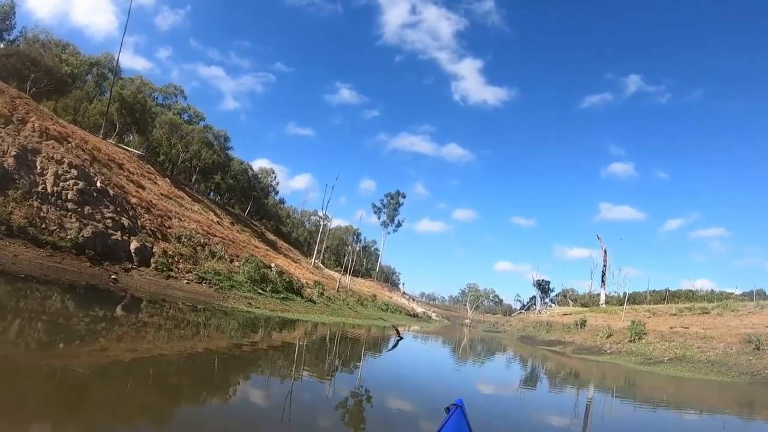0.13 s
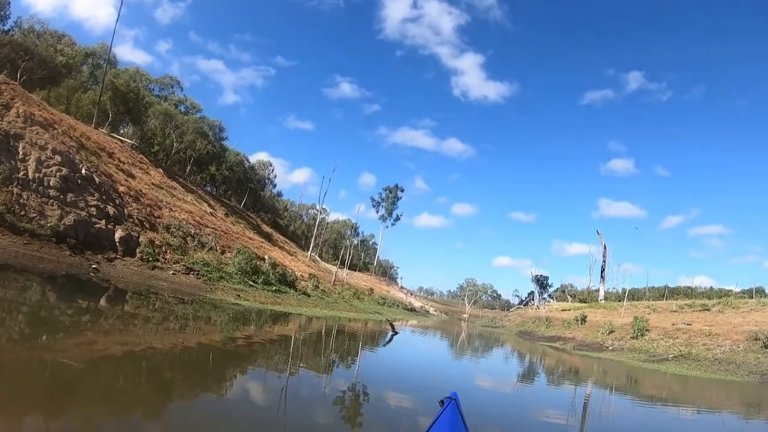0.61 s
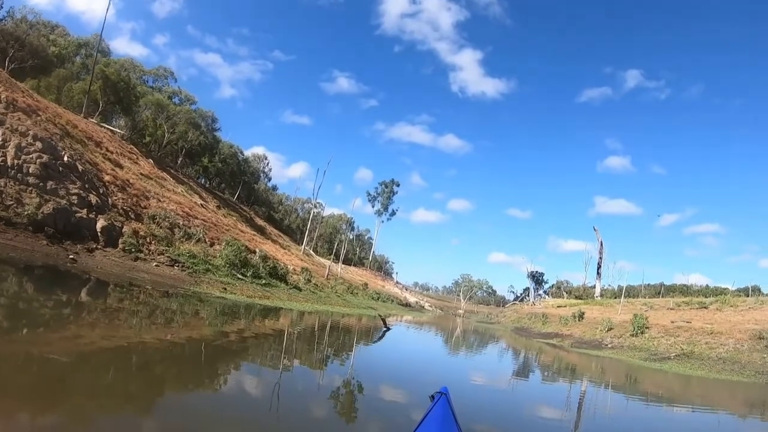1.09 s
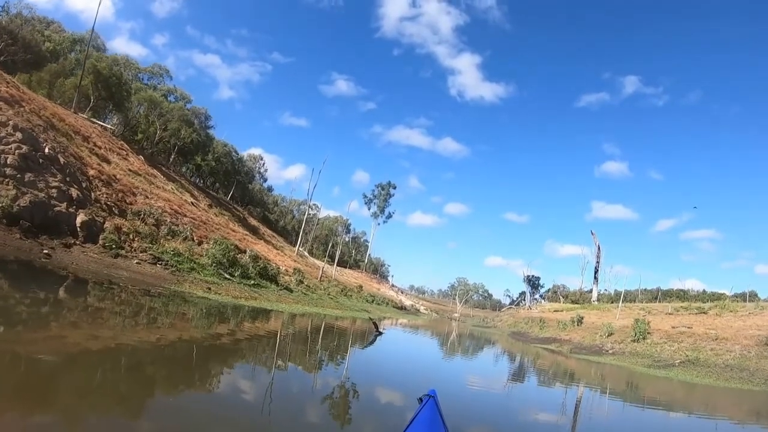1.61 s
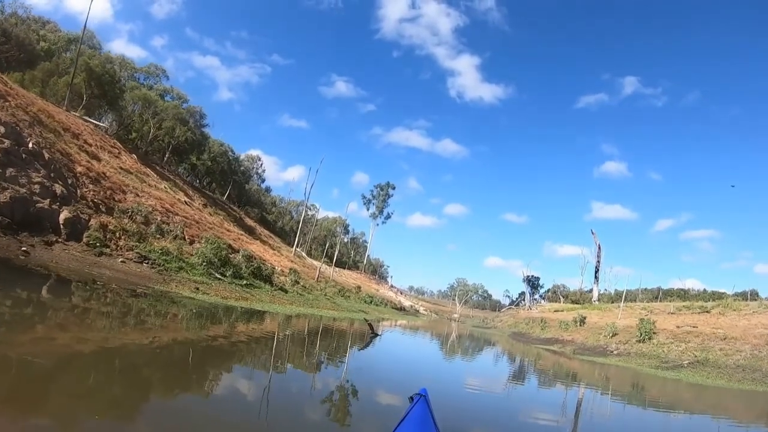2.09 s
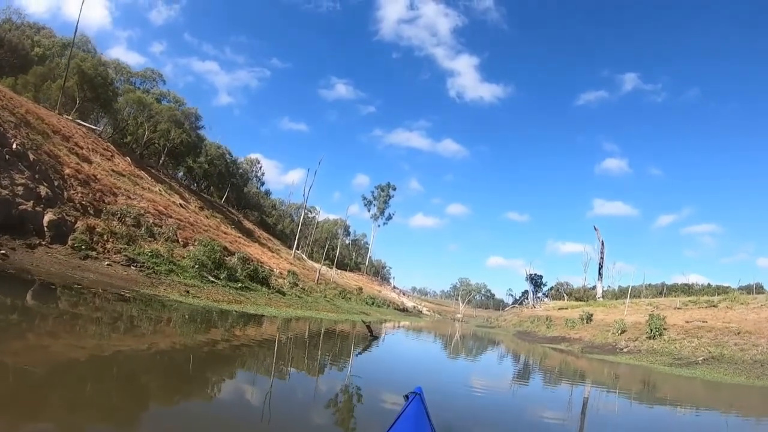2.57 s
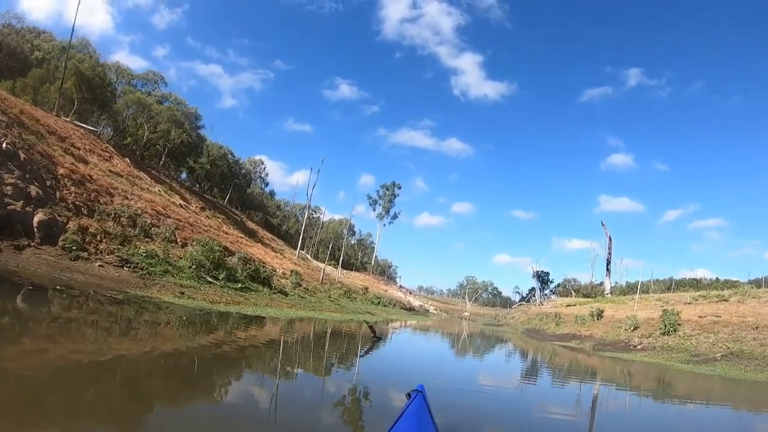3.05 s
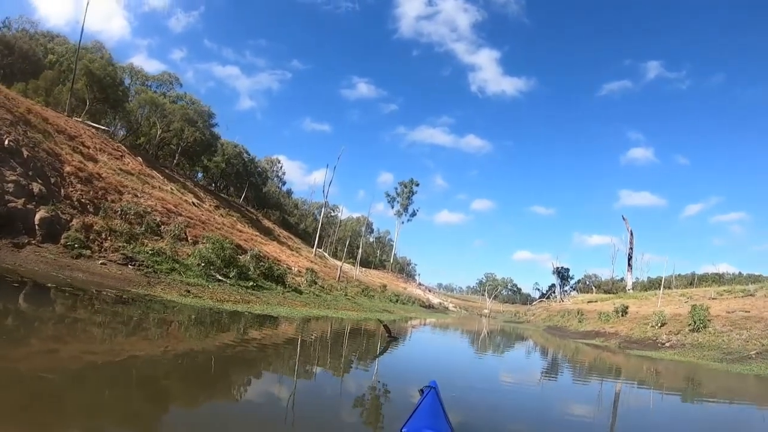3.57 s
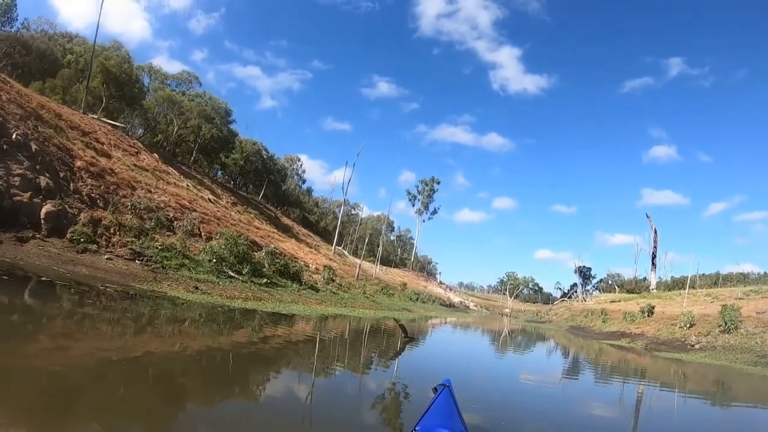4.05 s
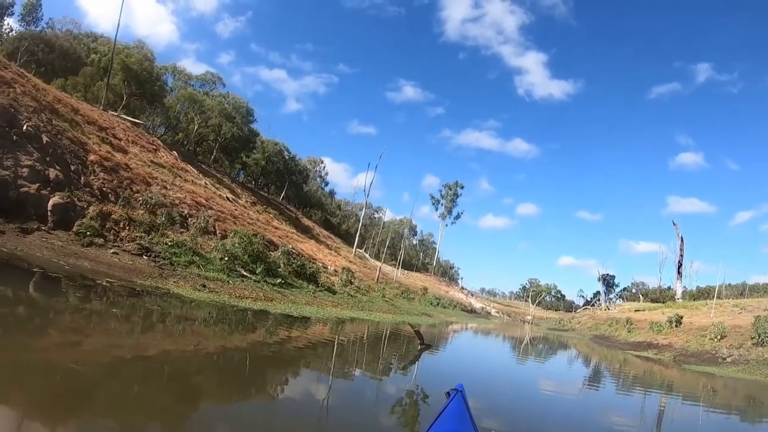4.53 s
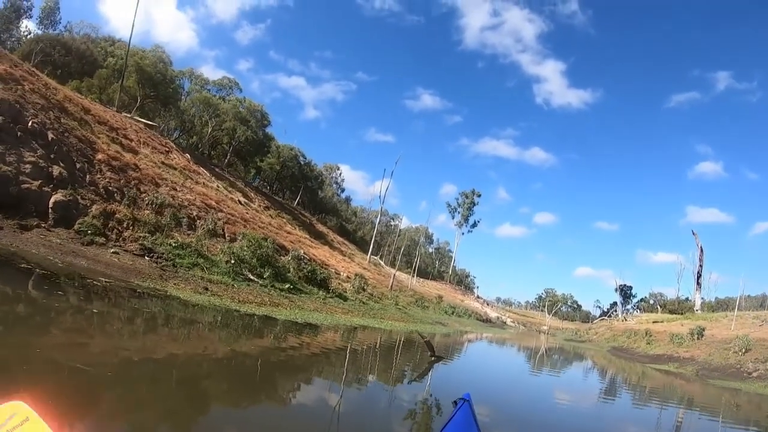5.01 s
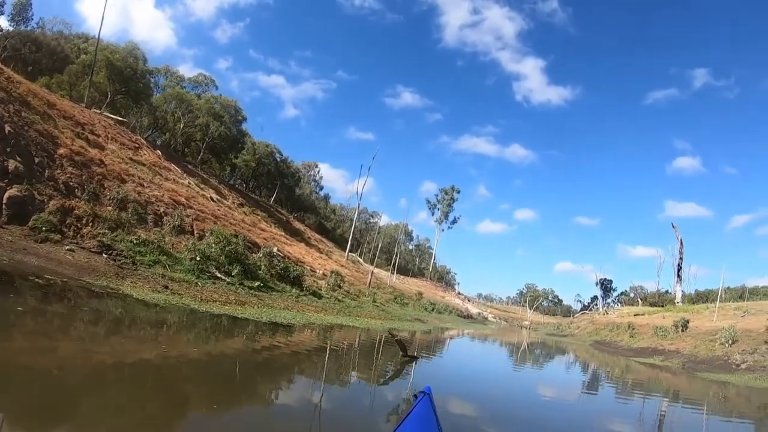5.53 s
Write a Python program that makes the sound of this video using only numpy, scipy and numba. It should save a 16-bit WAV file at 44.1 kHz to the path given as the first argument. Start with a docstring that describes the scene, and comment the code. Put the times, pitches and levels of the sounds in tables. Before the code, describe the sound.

Water laps a kayak hull while a bank insect trills in short phrases; drops plop, then a paddle clacks on the deck with a hollow boom.

```python
"""Calm river heard from a hollow plastic kayak by two microphone ports, left and right.
From the start wavelets slap the right side and ring the hull modes, filtered-noise gusts rumble on the ports,
the hull air throbs, and a bank insect trills in short phrases of gated tone until 4.3 s. From 2.5 s drops
plop as gliding decaying sines; at 4.1 s a gurgle climbs; at 4.34 s the paddle knocks and bounces, a click
with a modal deck boom; near 5.5 s fine drops spatter as grains. Faint insects and air hiss lie beneath."""
import sys
import numpy as np
from scipy import signal
from scipy.fft import rfft, irfft
from scipy.io import wavfile
from scipy.ndimage import uniform_filter1d
from numba import njit

SR = 44100
rng = np.random.default_rng(int(sys.argv[2]) if len(sys.argv) > 2 else 0)


def output_pcm(signal):
    """Save a mono or channel-first signal as 16-bit PCM at the path in sys.argv[1].

    Samples are clipped to [-1, 1] before scaling.
    """
    pcm = np.clip(np.atleast_2d(signal).T, -1, 1) * 32767
    wavfile.write(sys.argv[1], SR, np.round(pcm).astype(np.int16))


def makeup_ratio(level_db):
    """Linear amplitude ratio for a level in decibels (20 dB per factor of ten)."""
    decades = np.asarray(level_db, float) / 20
    return 10 ** decades


N = 248724
T = np.arange(N) / SR


def unit(x):
    """Scale to rms 1."""
    return x / np.sqrt(np.mean(x ** 2))


def band(x, lo_hz, hi_hz, order=2):
    """Butterworth band-pass."""
    return signal.sosfilt(signal.butter(order, [lo_hz, hi_hz], "band", fs=SR, output="sos"), x)


def curve(table):
    """Columns of a table joined by straight lines in time."""
    t_s, *columns = np.transpose(table)
    return [np.interp(T, t_s, column) for column in columns]


def walk(rate_hz):
    """Random levels held 1 / rate_hz and slewed twice, rms 1."""
    hold = int(SR / rate_hz)
    steps = np.repeat(rng.standard_normal(N // hold + 1), hold)
    slewed = uniform_filter1d(uniform_filter1d(steps, hold), hold)
    return unit(slewed[:N])


def sine(f_hz):
    """Sine following a frequency curve."""
    return np.sin(2 * np.pi * np.cumsum(f_hz) / SR)


def decay(t_s, t60_s):
    """Exponential fall by 60 dB in t60_s."""
    return np.exp(-np.log(1000) * t_s / t60_s)


def ring(x, modes):
    """Bank of decaying two-pole modes with alternating signs."""
    out = 0
    for k, (f_hz, db, t60_s) in enumerate(modes):
        r = decay(1 / SR, t60_s)
        w = 2 * np.pi * f_hz / SR
        mode = signal.lfilter([0, r * np.sin(w)], [1, -2 * r * np.cos(w), r * r], x)
        out = out + (-1) ** k * makeup_ratio(db) * mode
    return out


def add(out, t_s, x):
    """Mix x into out from t_s."""
    i = int(t_s * SR)
    n = min(x.shape[-1], N - i)
    out[..., i:i + n] += x[..., :n]


@njit
def svf(x, f_hz, width_hz):
    """State-variable band-pass with a moving centre."""
    y, b, l = np.empty(len(x)), 0., 0.
    for i in range(len(x)):
        g, k = np.tan(np.pi * f_hz[i] / SR), width_hz / f_hz[i]
        v = (b + g * (x[i] - l)) / (1 + g * (g + k))
        b, l, y[i] = 2 * v - b, l + 2 * g * v, k * v
    return y


def grit(shape, share, spread_db):
    """Sparse grains of very uneven size, rms 1."""
    luck = np.minimum(rng.exponential(size=shape), 4)
    hits = rng.random(shape) < share
    return unit(rng.standard_normal(shape) * hits * makeup_ratio(spread_db * luck))


def bubble(f_hz, db, cycles, glide=0.029):
    """A bubble glides up as it dies."""
    life_s = cycles / f_hz / 3
    t = T[:int(7 * life_s * SR)]
    tone = np.sin(2 * np.pi * f_hz * t * (1 + glide * t / life_s))
    return makeup_ratio(db) * tone * np.exp(-t / life_s) * np.minimum(3 * t / life_s, 1)


def from_right(near, far, left_db, split_hz=420, lag_s=.00027):
    """Long waves reach both ports alike; short ones reach the left late, weaker and by another path."""
    low = signal.butter(2, split_hz, fs=SR, output="sos")
    bass = signal.sosfiltfilt(low, near)
    round_about = np.roll(far - signal.sosfiltfilt(low, far), int(lag_s * SR))
    return np.array([bass + makeup_ratio(left_db) * round_about, near])


# wavelets against the hull: [t/s, relative level/dB, sharpness/dB, slosh t60/s]
SLAPS = [(0.085, -35.5, -14.5, 0.073), (0.364, -31, -23, 0.2), (.403, -31, -22, 0.16),
         (.422, -23.5, -9.5, 0.068), (.461, -23, -16.5, 0.14), (.482, -17.5, -15, 0.09),
         (0.489, -23.5, -22, 0.05), (.542, -30.5, -14, 0.034), (0.575, -37.5, -32, 0.068),
         (.602, -39.5, -22, 0.063), (.635, -41.5, -19, 0.1), (.673, -16.5, -20, 0.092),
         (0.872, -51, -32, .073), (.947, -47.5, -20, 0.31), (.981, -26.5, -18, 0.13),
         (1.004, -36.5, -18, 0.16), (1.034, -48, -18, 0.07), (1.086, -43.5, -35, .069),
         (1.112, -47, -32, 0.083), (1.139, -44, -35, 0.12), (1.164, -50, -33, 0.05),
         (1.202, -55, -24, .054), (1.254, -30.5, -19.5, .077), (1.294, -44.5, -32, 0.067),
         (1.43, -44.5, -18, 0.11), (1.459, -22.5, -14.5, 0.039), (1.467, -23.5, -18, 0.098),
         (1.587, -39, -25.5, 0.21), (1.742, -45.5, -20, 0.033), (1.817, -38, -19.5, 0.13),
         (1.89, -41, -12, 0.12), (2.004, -39, -28, 0.42), (2.034, -35, -17, 0.052),
         (2.059, -45.5, -5, 0.11), (2.148, -21.5, -17, .1), (2.215, -42.5, -9.5, 0.15),
         (2.226, -28.5, -19, 0.13), (2.244, -30.5, -16.5, 0.048), (2.348, -39.5, -21.5, 0.053),
         (2.537, -46.5, -12.5, 0.22), (2.608, -28.5, -17.5, 0.062), (2.696, -31.5, -22, .091),
         (2.803, -37, -19, 0.11), (2.833, -24, -14, 0.083), (3.095, -38.5, -31, 0.064),
         (3.112, -38.5, -34.5, 0.068), (3.314, -44.5, -18, 0.055), (3.338, -43, -20, 0.054),
         (3.387, -43, -16, 0.068), (3.562, -45.5, -17, 0.14), (3.655, -28.5, -18.5, 0.068),
         (3.689, -38.5, -13, 0.13), (3.729, -41, -24, 0.1), (3.821, -39.5, -35, 0.16),
         (3.865, -23, -15.5, 0.095), (4.18, -34, -25, 0.28), (4.203, -24, -13, 0.062),
         (4.247, -37.5, -20.5, 0.26), (4.657, -40.5, -28, .041), (4.743, -19, -13.5, 0.098),
         (5.02, -45, -23, 0.049), (5.489, -47.5, -8.5, .2)]


def slaps():
    """Each slap is a sharp blow and a dying slosh; steeper ones push the upper modes more."""
    blow, push, sharp = np.zeros(N), np.zeros((2, N)), np.zeros((2, N))
    t = T[:6000]
    for t_s, db, sharp_db, t60_s in SLAPS:
        slosh = makeup_ratio(-19.5) * grit((2, len(t)), 0.12, 1.52)
        slosh = slosh * decay(t, max(t60_s, .01)) * np.minimum(t / 0.0035, 1)
        slosh[:, 0] = [1.3, .4]  # the first blow faces the right port
        add(blow, t_s, makeup_ratio([db]))
        add(push, t_s, makeup_ratio(db) * slosh)
        add(sharp, t_s, makeup_ratio(db + sharp_db) * slosh)
    return blow, push, sharp


def froth(lap_db, count=7, per_s=90):
    """Bubbles left by every slap, and strays in the sliding water."""
    out = np.zeros(N)
    for t_s, db, _, t60_s in SLAPS:
        for late, size, luck in rng.random((count, 3)):
            bubble_db = db - 3.0 - 24 * late - 8 * luck - 6 * size
            add(out, t_s + .5 * late * t60_s, bubble(450 * 5 ** size, bubble_db, 16))
    for when, size, luck in rng.random((int(per_s * N / SR), 3)):
        bubble_db = lap_db[int(when * (N - 1))] + 3.5 - 12 * luck - 8 * size
        add(out, when * T[-1], bubble(300 * 6 ** size, bubble_db, 13))
    return out


# spray thrown up by the steeper slaps: [t/s, relative level/dB]
SPRAYS = [(0.083, -55.5), (.422, -42), (0.46, -47), (.482, -45.5), (.49, -50), (.542, -59), (.673, -44.5),
          (0.983, -71), (1.254, -62), (1.459, -51), (1.467, -51.5), (1.776, -56.5), (1.815, -57),
          (1.889, -60), (2.033, -56.5), (2.058, -50), (2.148, -52.5), (2.214, -51), (2.244, -60),
          (2.695, -55), (2.833, -46), (3.688, -56), (3.73, -57), (3.867, -50.5), (4.202, -51), (4.247, -59),
          (4.744, -39), (5.483, -52)]


def spray():
    """Each spray is a noise burst with a fast and a slow decay."""
    out, t = np.zeros((2, N)), T[:6000]
    for t_s, db in SPRAYS:
        envelope = np.exp(-t / 0.00029) + 0.46 * np.exp(-t / 0.0053)
        add(out, t_s, makeup_ratio(db) * rng.standard_normal((2, len(t))) * envelope)
    return makeup_ratio(13.0) * band(out, 2200, 5520)


# hull shell modes: [f/Hz, relative level/dB, t60/s]
HULL = [(200.3, -13.5, 0.14), (282.6, -10.5, 0.072), (414, -7, 0.091), (479, -4.5, 0.083), (550, 1, 0.02),
        (653.6, -2, 0.06), (765.7, 2, 0.036), (938, 1.5, 0.027), (1065.5, 3, 0.02), (1275, 0, 0.022),
        (1376, -7.5, 0.04), (1558, -2.5, 0.021), (1723, -11.5, 0.052), (1930, -3.5, 0.01),
        (2248, -11, 0.019), (2485, -12.5, 0.02), (2888, -13, 0.01), (3360, -14.5, 0.0054)]
# water sliding along the hull: [t/s, relative level/dB, relative hiss level/dB]
LAP = [(0, -65.5, -78), (.36, -61, -70), (.56, -49.5, -78), (.72, -48, -77), (.8, -61, -86),
       (.85, -78, -92), (.93, -63.5, -85), (1.15, -71, -89), (1.35, -77, -90), (1.7, -79, -80),
       (1.85, -58, -81), (2.03, -64.5, -65), (2.33, -68, -80), (2.51, -57.5, -66), (2.65, -56.5, -63.5),
       (2.74, -51, -64.5), (2.88, -53.5, -67), (3.04, -60.5, -78), (3.32, -66.5, -77.5), (3.65, -50, -62),
       (3.78, -53, -66), (3.96, -60, -73.5), (4.2, -60.5, -67.5), (4.32, -45, -61.5), (4.48, -55, -87),
       (4.61, -65.5, -89), (4.76, -59, -63), (4.92, -63, -67.5), (5.24, -68.5, -67.5), (5.43, -68.5, -66.5),
       (5.52, -57.5, -65.5), (5.64, -61.5, -66)]
LEFT_DB, LEFT_SWAY_DB = -5, 1.5  # shadow of the left port


def water():
    """Slaps and sliding water drive the hull modes; smack, bubbles, spray and hiss come direct."""
    blow, push, sharp = slaps()
    lap_db, hiss_db = curve(LAP)
    flutter_db = 2.5 * walk(40)
    sliding = grit((2, N), 0.046, 2.9) * makeup_ratio(lap_db + flutter_db + 3.4 * walk(21) - 16)
    lower = ring(push + sliding, HULL[:10])
    upper = ring(makeup_ratio(20.0) * sharp + sliding, HULL[10:])
    near, other = makeup_ratio(-7) * (lower + upper)
    smack = makeup_ratio(13.5) * band(blow, 750, 1600)  # heard through the air
    bubbles = froth(lap_db)
    near = near + smack + bubbles
    far = 0.14 * near + 0.96 * other + .5 * bubbles
    hiss = unit(band(grit((2, N), 0.26, 1.3), 2000, 4000)) * makeup_ratio(hiss_db + .5 * flutter_db)
    return from_right(near, far, LEFT_DB + LEFT_SWAY_DB * walk(14)) + spray() + hiss


# paddle on the deck and its bounces: [t/s, relative click level/dB, relative thud level/dB]
KNOCKS = [(4.339, -1, -5), (4.347, -17.5, -5.5), (4.356, -42, -18.5), (4.365, -40, -11.5),
          (4.376, -21.5, -7), (4.39, -37, -20), (4.466, -24, -31), (4.54, -40.5, -51)]
# deck modes under the paddle: [f/Hz, relative level/dB, t60/s]
DECK = [(61.1, -6, 0.59), (84.1, 1.5, 0.38), (103.1, -17.5, 0.53), (124.7, -4, 0.068), (150, 4.5, 0.086),
        (162, -7, 0.35), (191.5, 2.5, 0.22), (227, -3.5, 0.21), (250, -8, 0.12), (280.8, -12.5, 0.3),
        (425.5, -12.5, 0.2)]


def paddle():
    """A hard click with a rattle of the mount, and the deck's boom, nearly centred."""
    click, rattle, wash = np.zeros((2, N)), np.zeros((2, N)), np.zeros((2, N))
    thud, t = np.zeros(N), T[:8000]
    for t_s, click_db, thud_db in KNOCKS:
        add(click, t_s, makeup_ratio(click_db) * np.array([[1.15], [.85]]))
        shake = rng.standard_normal(len(t)) + .5 * rng.standard_normal((2, len(t)))
        rattle_envelope = np.exp(-t / 0.0031) + 0.072 * np.exp(-t / 0.022)
        add(rattle, t_s, makeup_ratio(click_db) * shake * rattle_envelope)
        add(wash, t_s, makeup_ratio(thud_db) * shake * np.exp(-t / 0.026))  # water jolted inside the hull
        add(thud, t_s, makeup_ratio(thud_db) * np.hanning(60) / 30)
    tick = makeup_ratio(9.0) * band(click, 2200, 4600) + makeup_ratio(4.5) * band(click, 500, 1400)
    # the shortest waves meet the ports out of step
    tick += makeup_ratio(-16.0) * band(click, 6000, 11000, order=3) * np.array([[1.], [-.45]])
    buzz = makeup_ratio(-13.0) * band(rattle, 1200, 3000) + makeup_ratio(-2.5) * band(rattle, 300, 1520)
    # the finest part scatters between the ports
    edge = makeup_ratio(-42) * band(rattle * rng.standard_normal((2, N)), 4500, 8300, order=3)
    splash = makeup_ratio(-6.5) * band(wash, 290, 707) + makeup_ratio(-25.5) * band(wash, 600, 1500)
    jolt = ring(thud, [(45.3, -15.5, 0.68)])  # the whole boat bobs
    boom = makeup_ratio(-10.5) * ring(thud, DECK) * makeup_ratio(np.array([[-.8], [.8]]))
    return jolt + tick + buzz + splash + edge + boom


# falling drops: [t/s, f/Hz, level/dB, cycles in three decay times]
DROPS = [(2.492, 2940, -44, 5.8), (3.024, 3990, -42.5, 9.2), (3.05, 4000, -48, 7.6),
         (3.391, 2266, -45.5, 6.8), (3.655, 1303, -32, 34.7), (3.915, 748, -39, 49), (3.94, 724, -37.5, 15),
         (3.985, 716, -47, 15), (4.284, 766, -34, 23), (5.032, 129, -33.5, 8.7), (5.147, 149.7, -34.5, 9.1),
         (5.286, 3200, -43, 13), (5.433, 5530, -46, 6.5), (5.434, 4300, -46, 5.9), (5.448, 3630, -44, 6),
         (5.495, 614, -41, 39), (5.493, 322, -47, 17)]


def drops():
    """Each drop rings one bubble, alike at both ports."""
    out = np.zeros(N)
    for t_s, f_hz, db, cycles in DROPS:
        add(out, t_s, bubble(f_hz, db, cycles, glide=0.0032))
    return out


CLIMB_S, CLIMB_HZ, CLIMB_DB = (4.135, 4.305), (152.7, 294.7), -43.5


def climbing_gurgle():
    """A sine climbs as a pocket under the hull fills."""
    inside = uniform_filter1d(1. * (T > CLIMB_S[0]) * (T < CLIMB_S[1]), 600)
    return inside * makeup_ratio(CLIMB_DB + 1.4 * walk(46)) * sine(np.interp(T, CLIMB_S, CLIMB_HZ))


# two bursts of fine drops: [loudest t/s, relative level/dB]
SPATTER = [(5.452, -70), (5.487, -52)]
SPATTER_RISE_DB_S, SPATTER_FALL_DB_S = 540, 900


def spatter():
    """Fine drops crackle as band-passed grains, louder on the left."""
    bursts = 0
    for t_s, db in SPATTER:
        slope_db = np.minimum(SPATTER_RISE_DB_S * (T - t_s), SPATTER_FALL_DB_S * (t_s - T))
        bursts = bursts + makeup_ratio(db + slope_db)
    crackle = unit(band(grit((2, N), 0.056, 2.5), 2380, 7900)) * bursts * makeup_ratio(3.5 * walk(200))
    return crackle * makeup_ratio(np.array([[3.], [-3.]]))


# wind on the ports, in segments: [t/s, relative level/dB, left minus right/dB]
GUST = [
    [(0.0, -59, 16), (0.16, -42.5, 3), (0.2, -60, 6), (1.07, -64, -2), (1.21, -58, 7.0), (1.44, -71, -16),
     (1.53, -40, 13), (1.78, -64.5, -9.0), (2.59, -41, 4), (2.7, -75, -4.5)],
    [(2.7, -61, 3), (2.92, -57, 1), (3.282, -52, 0), (3.3, -63, -2.5), (3.714, -57, 5), (3.75, -45.5, -1),
     (3.972, -49, -1.5), (4.008, -50, 14), (4.048, -55, -9), (4.32, -55.5, 1.0)],
    [(4.54, -47, -12), (4.67, -53, 5), (4.728, -42.5, 16), (4.95, -38.5, 3.5), (5.016, -40, 27.5),
     (5.062, -41, 16.5), (5.37, -47, 11), (5.41, -53, -11), (5.458, -40.5, 14), (5.64, -45.5, 11.0)],
]


def gusts():
    """Low rumble, partly shared, panned from port to port."""
    gust_db, pan_db = curve(sum(GUST, []))
    shared, *own = unit(band(rng.standard_normal((3, N)), 13.2, 58.7, order=3))
    level_db = gust_db + 1.6 * walk(12) + np.array([pan_db, -pan_db]) / 2
    return (0.61 * shared + 1.12 * np.array(own)) * makeup_ratio(level_db)


# throb of the hull air, in segments: [t/s, relative level/dB]
THROB = [
    [(0.0, -66), (0.048, -64), (0.144, -38), (0.256, -63), (0.312, -47.5), (0.392, -56), (0.436, -39.5),
     (0.746, -59), (0.778, -85), (1.41, -64), (1.44, -79)],
    [(1.44, -71), (1.516, -54), (1.812, -63.5), (2.438, -49), (2.48, -61), (2.548, -41.5), (2.982, -42),
     (3.014, -37.5), (3.06, -46), (3.134, -37.5), (3.3, -51.5)],
    [(3.3, -53), (3.518, -49), (3.572, -28.5), (3.626, -29.5), (3.672, -44), (3.75, -37), (4.018, -42.5),
     (4.072, -36.5), (4.142, -45), (4.304, -38.5), (4.32, -32.5)],
    [(4.54, -41.5), (4.8, -54), (4.852, -41.5), (5.01, -49.5), (5.036, -34), (5.118, -53), (5.158, -43),
     (5.348, -65), (5.508, -46), (5.6, -54.5), (5.64, -44)],
]
# its centre pitch, climbing with the gurgle and lower after the knock: [t/s, f/Hz]
THROB_HZ = [(0, 82.3), (1.3, 82), (1.5, 58.1), (2.4, 58.25), (2.56, 81), (4.02, 79), (4.2, 112.1),
            (4.32, 112.1), (4.52, 57.55), (5.04, 74), (5.25, 59.2), (5.64, 60)]


def throb():
    """A wavering tone with turbulence round it, nearly the same at both ports."""
    (throb_db,), (f_hz,) = curve(sum(THROB, [])), curve(THROB_HZ)
    tone = np.sqrt(2) * sine(f_hz * (1 + 0.056 * walk(30)))
    rough = unit(band(rng.standard_normal((2, N)), 50, 110.0))
    mix = 0.72 * tone + 0.87 * rough[0] + 0.14 * rough[1] * np.array([[1], [-1]])
    return mix * makeup_ratio(throb_db + 1.9 * walk(20))


# upper boom of the hull air, before and after the knock: [t/s, relative level/dB]
BOOM = [
    [(0.0, -59), (0.36, -61), (0.54, -49), (0.61, -55), (0.76, -58), (1.39, -68.5), (2.3, -53.5),
     (2.42, -54), (2.81, -51.5), (3.24, -56), (3.75, -49), (3.95, -55), (4.15, -52.5), (4.32, -46.5)],
    [(4.54, -58), (4.696, -61), (5.286, -69.5), (5.508, -76), (5.64, -63)],
]
BOOM_HZ, BOOM_WANDER, GURGLE_WIDTH_HZ = 181.5, 0.16, 35.  # wander: rms of log pitch


def hull_boom():
    """Narrow noise round a wandering centre, over a broader band."""
    (boom_db,) = curve(sum(BOOM, []))
    boom_hz = BOOM_HZ * np.exp(BOOM_WANDER * walk(15))
    once = svf(rng.standard_normal(N), boom_hz, GURGLE_WIDTH_HZ)
    gurgle = unit(svf(once, boom_hz, GURGLE_WIDTH_HZ))
    broad = band(rng.standard_normal(N) + 0.43 * rng.standard_normal((2, N)), 123, 262)
    return (0.84 * gurgle + 0.89 * unit(broad)) * makeup_ratio(boom_db + 2.8 * walk(17))


# last pulse of each insect phrase: [t/s]
TRILL_ENDS_S = [0.078, .291, .501, .707, .926, 1.121, 1.312, 1.523, 1.726, 1.932, 2.159, 2.373, 2.583,
                2.806, 3.009, 3.202, 3.405, 3.628, 3.834, 4.07, 4.296]
# song loudness: [t/s, relative level/dB]
TRILL_DB = [(0, -62), (.9, -63.5), (1.4, -60), (2.7, -61.5), (3.2, -63.5), (4, -66), (4.3, -63)]
TRILL_PERIOD_S, STROKE_S, STROKES = .0128, .0095, 14


def insect(f_hz=7680, width_hz=260, swell_db=7):
    """Wing strokes about 78 a second, swelling through each phrase; left late and weaker."""
    gate, t = np.zeros(N), T[:int(STROKE_S * SR)]
    for last_s in TRILL_ENDS_S:
        for early_s in TRILL_PERIOD_S * np.arange(STROKES):
            fade = np.clip(early_s / 0.12 - .25, 0, 1)
            if last_s > early_s:
                stroke = makeup_ratio(rng.normal() - swell_db * fade) * np.hanning(len(t))
                add(gate, max(last_s - early_s - STROKE_S / 2, 0), stroke)
    tone = sine(f_hz * (1 + .002 * walk(30)))
    rasp = unit(band(rng.standard_normal(N), f_hz - width_hz, f_hz + width_hz))
    song = gate * (tone + 0.37 * rasp) * makeup_ratio(curve(TRILL_DB)[0] + 5.5)
    return np.array([makeup_ratio(-12.0) * np.roll(song, 2), song])


def far_insects(f_hz=4350, width_hz=350, db=-82):
    """A faint, slightly swaying hiss from the reeds: band-passed noise."""
    sway_db = 1.5 * walk(8)
    hiss = unit(band(rng.standard_normal((2, N)), f_hz - width_hz, f_hz + width_hz))
    return hiss * makeup_ratio(db + sway_db)


# still air and microphone hiss: [f/Hz, relative density/dB]
AIR = [(180, -12.5), (300, -8), (573, -16), (761, -13.5), (919, -26), (1520, -16), (2600, -29.5),
       (4310, -26.5), (6100, -32.5), (7600, -29.5), (9340, -36), (11300, -55), (13000, -57.5)]
AIR_DB = -69.5  # of the shared part, 807-13000 Hz


def air():
    """A smooth noise floor, partly shared between the ports."""
    f_hz, db = np.transpose(AIR)
    gain = makeup_ratio(np.interp(np.log(np.fft.rfftfreq(N, 1 / SR) + 1), np.log(f_hz), db))
    mid, side = irfft(rfft(rng.standard_normal((2, N))) * gain, N)
    ports = np.array([mid + 0.71 * side, mid - 0.71 * side])
    return makeup_ratio(AIR_DB) * ports / np.std(band(mid, 807, 13000))


def scene():
    """All sources at the two ports."""
    river = water() + paddle() + drops() + climbing_gurgle() + spatter()
    wind = gusts() + throb() + hull_boom()
    return river + wind + insect() + far_insects() + air()


def roll_off(x):
    """The treble ends steeply here."""
    return signal.sosfilt(signal.butter(12, 14800, fs=SR, output="sos"), x)


def record(dry):
    """The waterproof housing dulls the top: a low-pass at 11 kHz."""
    housing = signal.butter(2, 11000, fs=SR, output="sos")
    mix = signal.sosfilt(housing, dry)
    return roll_off(mix)


dry = scene()
out = record(dry)
output_pcm(out)
```